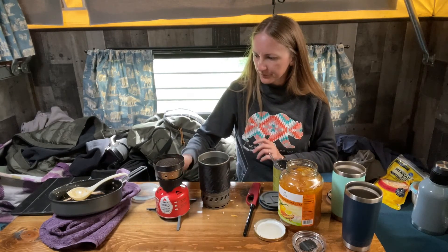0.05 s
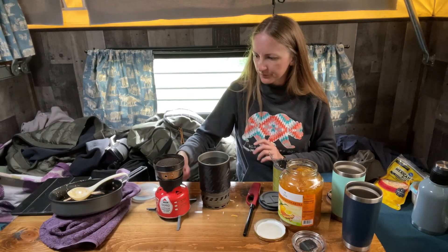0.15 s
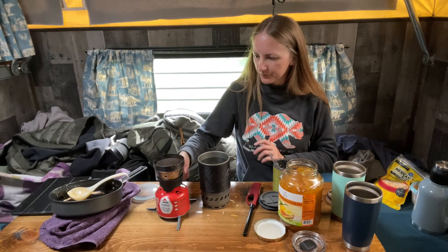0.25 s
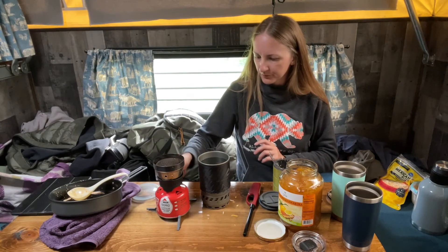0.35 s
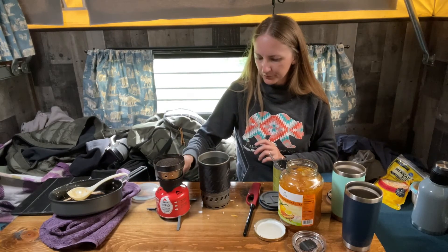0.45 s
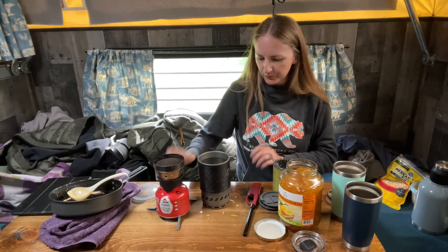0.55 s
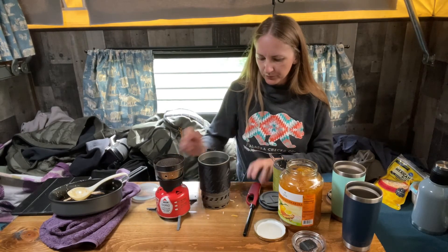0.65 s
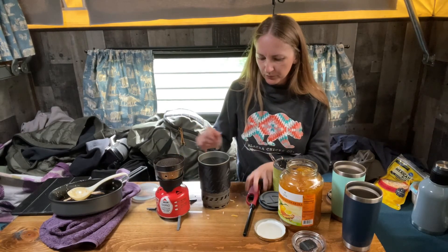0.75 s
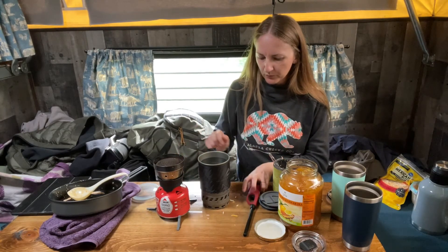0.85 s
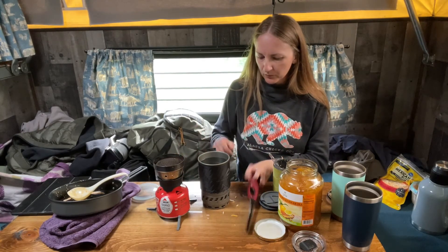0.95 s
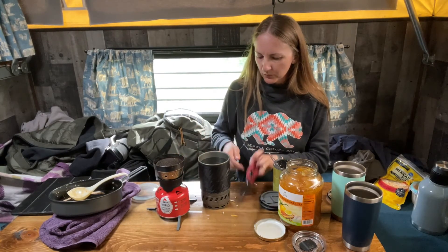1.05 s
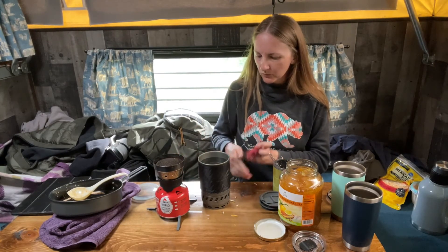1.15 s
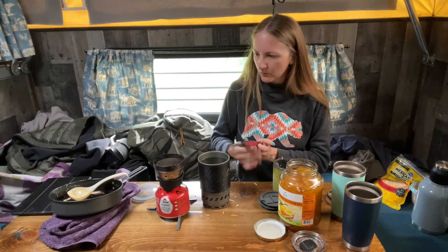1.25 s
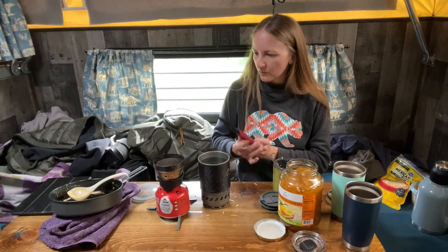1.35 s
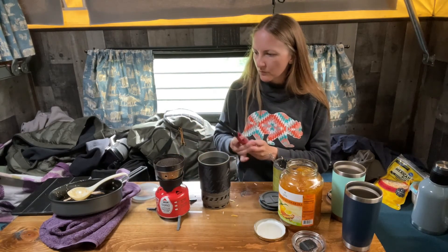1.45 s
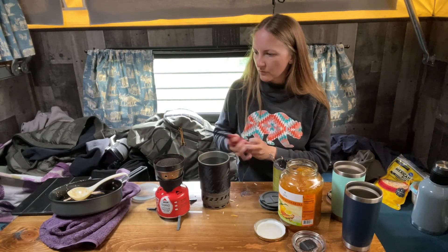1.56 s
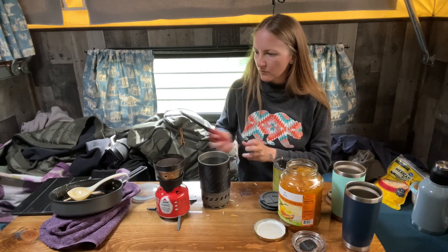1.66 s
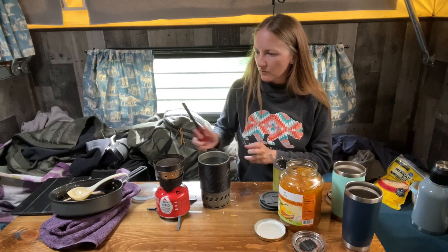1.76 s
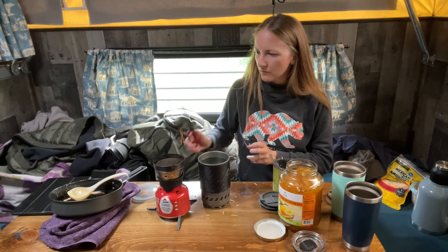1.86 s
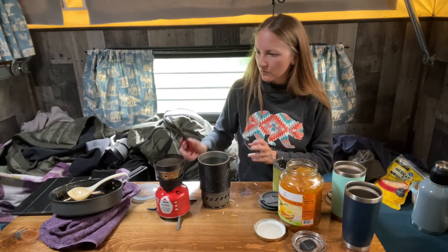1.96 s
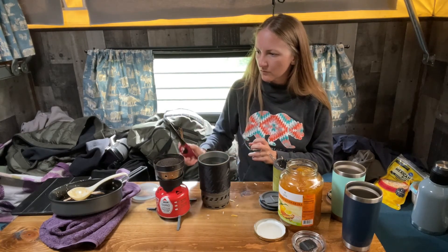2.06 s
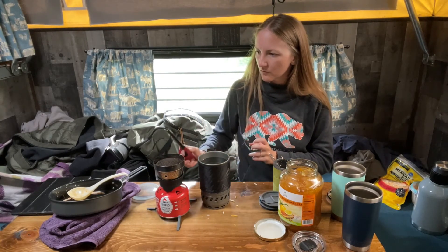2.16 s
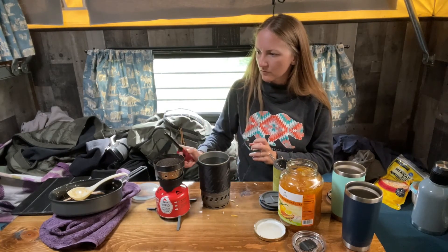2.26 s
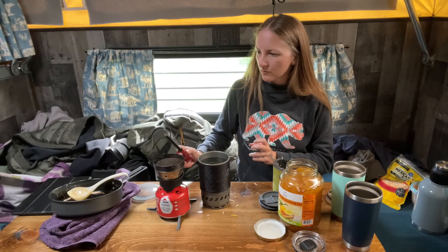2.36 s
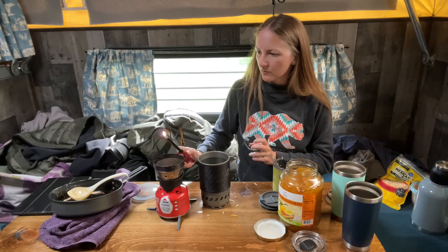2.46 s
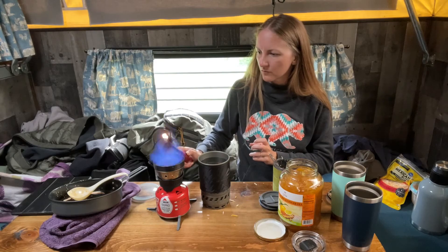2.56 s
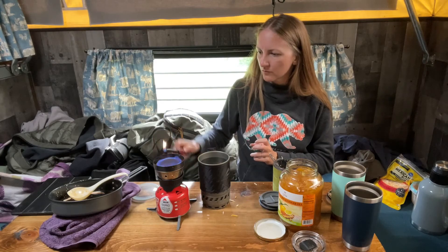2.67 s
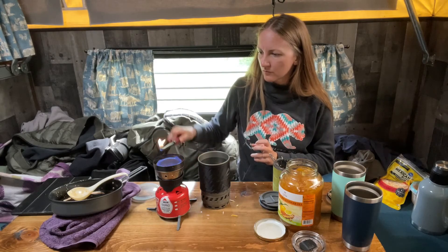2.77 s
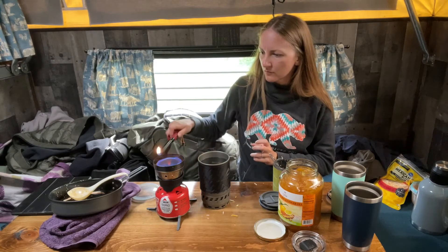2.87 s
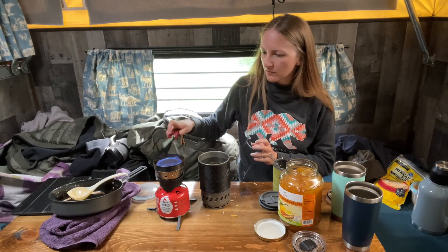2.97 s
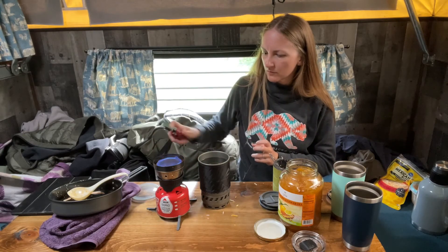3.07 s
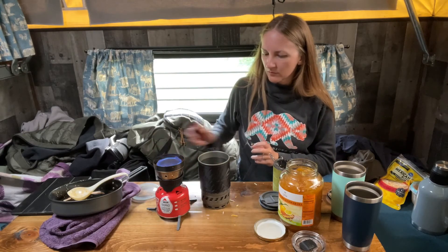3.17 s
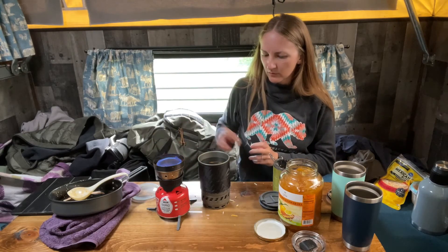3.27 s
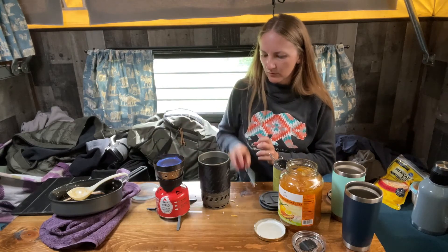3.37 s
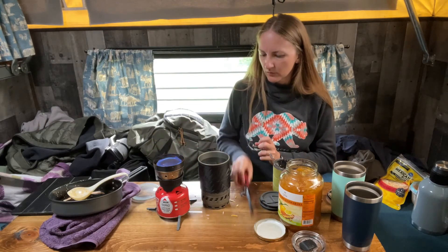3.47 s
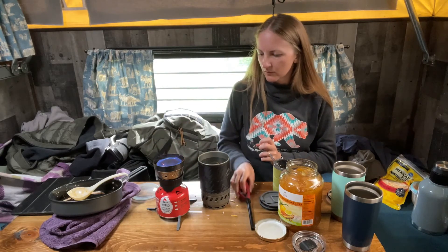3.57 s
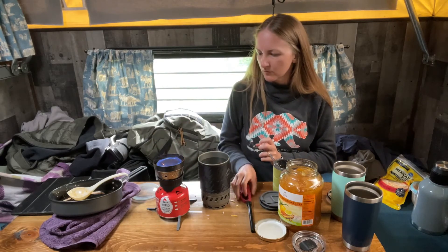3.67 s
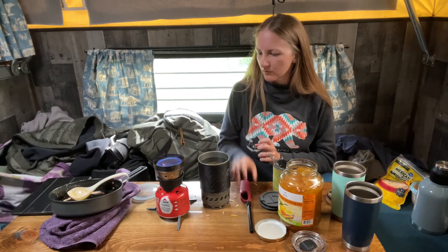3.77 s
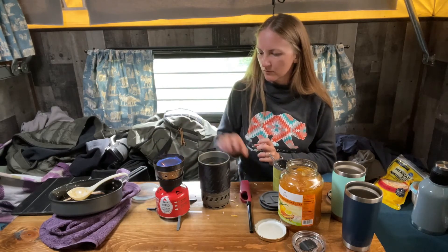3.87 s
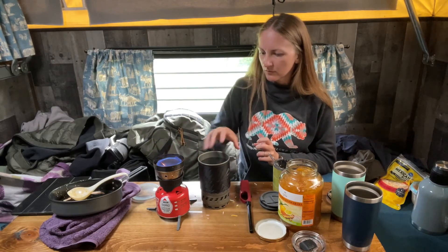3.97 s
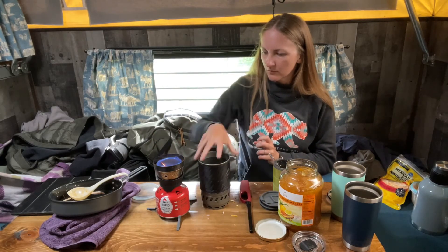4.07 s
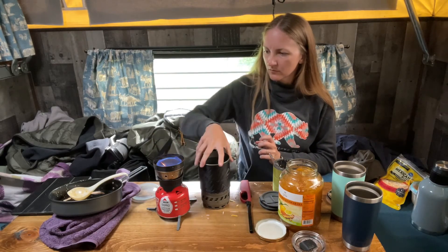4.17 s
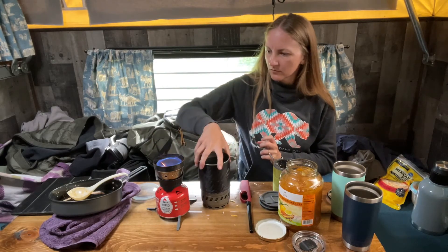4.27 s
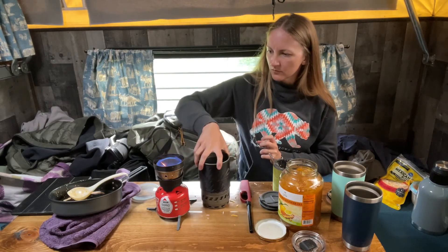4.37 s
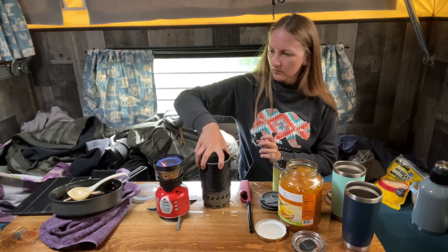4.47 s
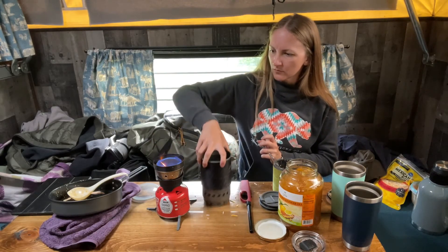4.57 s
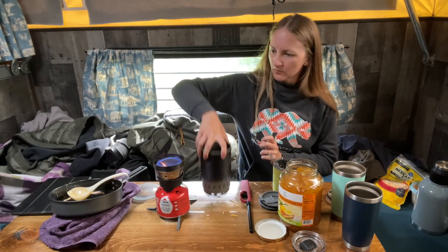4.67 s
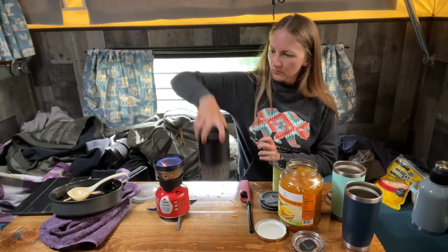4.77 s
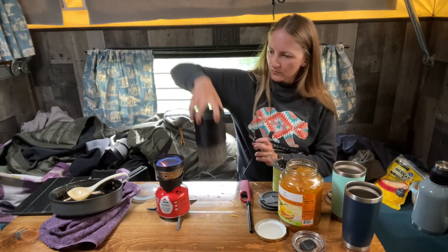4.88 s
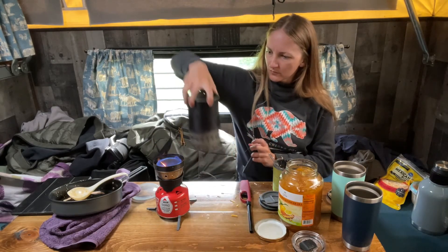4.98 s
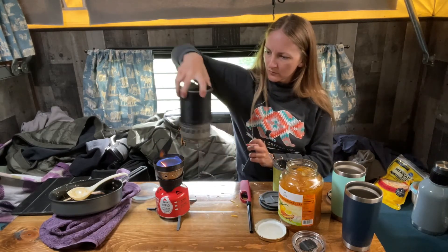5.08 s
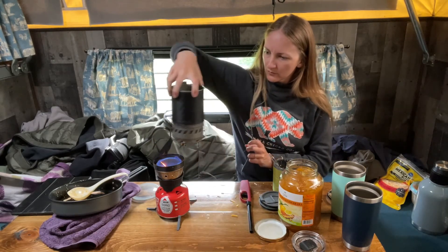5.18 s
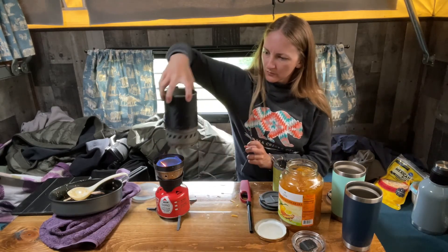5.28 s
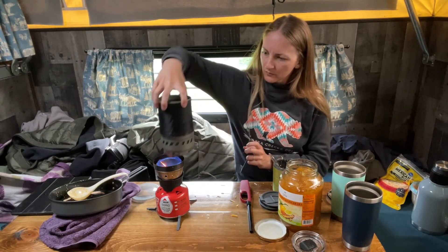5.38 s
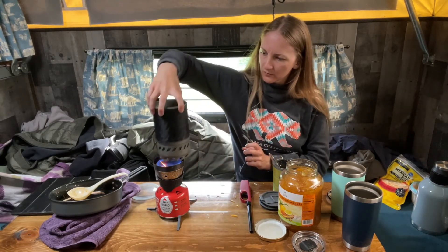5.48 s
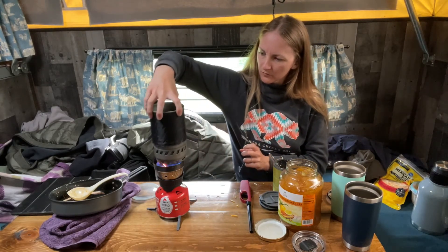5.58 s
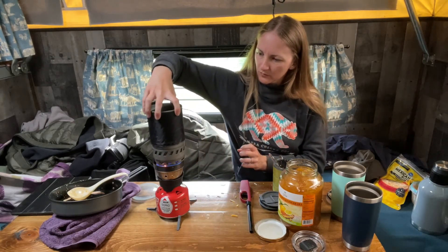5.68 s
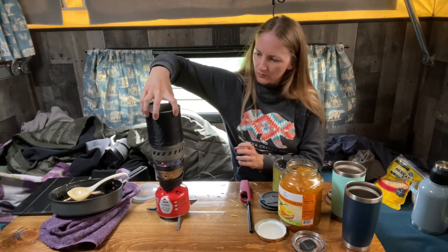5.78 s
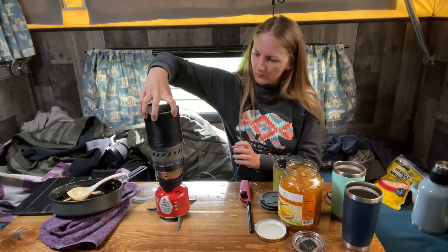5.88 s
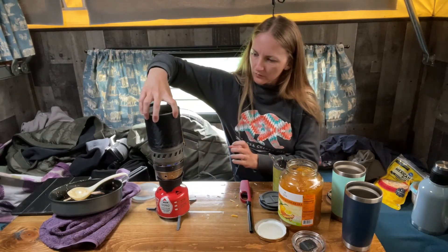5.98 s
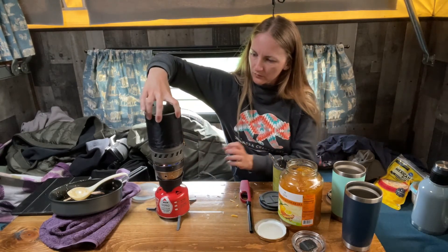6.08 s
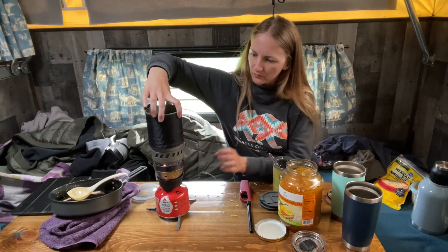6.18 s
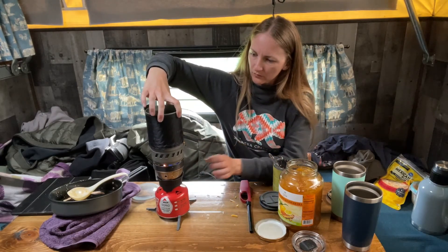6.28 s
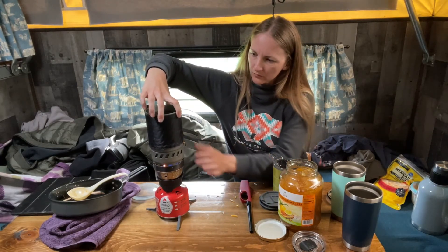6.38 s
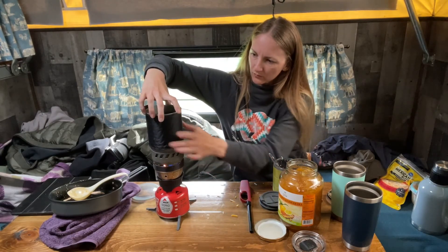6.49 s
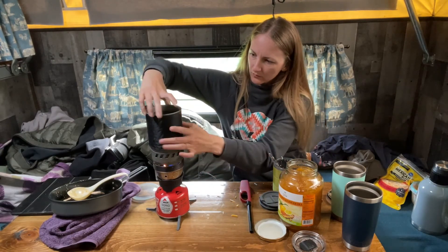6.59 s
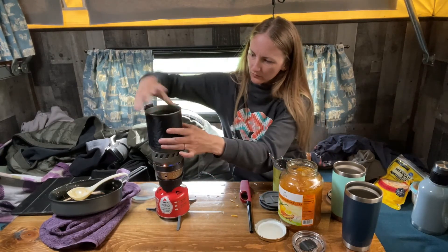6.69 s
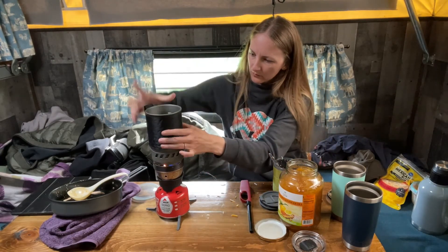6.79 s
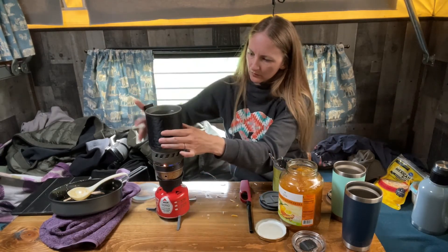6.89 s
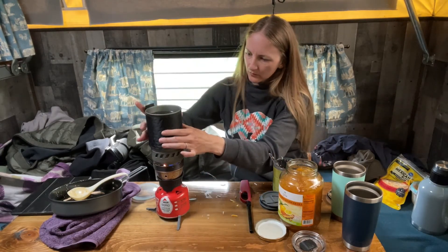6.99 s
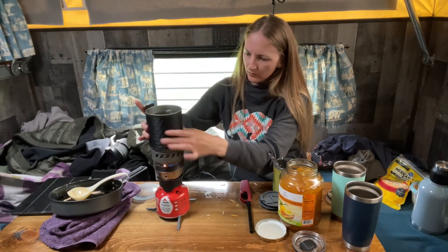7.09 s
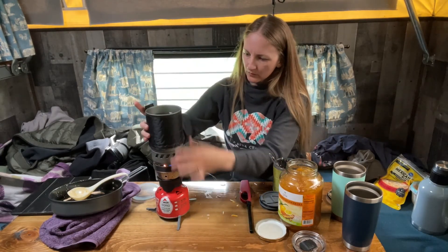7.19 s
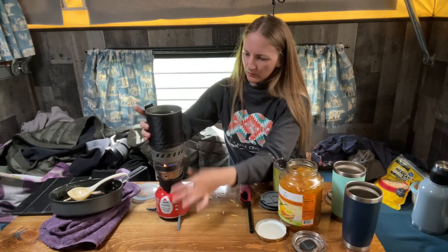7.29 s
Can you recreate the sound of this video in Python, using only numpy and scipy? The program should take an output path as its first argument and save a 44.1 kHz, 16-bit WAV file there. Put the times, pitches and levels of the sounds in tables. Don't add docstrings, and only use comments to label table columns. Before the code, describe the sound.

In a small padded cabin, stove gas hisses, a loud lighter click ignites it with a low whump, then tool and pot clunk down.

```python
import sys
import numpy as np
from scipy import signal
from scipy.fft import rfft, irfft, next_fast_len
from scipy.io import wavfile
from scipy.ndimage import uniform_filter1d

SR = 44100
rng = np.random.default_rng(int(sys.argv[2]) if len(sys.argv) > 2 else 0)


def boost_factor(decibels):
    exponent = np.asarray(decibels, float) / 20
    return 10 ** exponent


def transcribe(signal):
    frames = np.atleast_2d(signal).T
    limited = np.clip(frames, -1, 1)
    pcm = np.round(limited * 32767).astype(np.int16)
    wavfile.write(sys.argv[1], SR, pcm)


N = 323694
TIME_S = np.arange(N) / SR

# time_s, cover_0_to_1
POT_COVER = [
    (0, 0.05),
    (5.0, 0),
    (5.45, .3),
    (5.85, 0.62),
    (7.34, 0.76),
]
# pitch_hz, level_db_per_hz
OPEN_JET = [(76, -58), (130, -26.5), (450, -17.5), (640, -11), (1080, -18.5), (1700, -4.5), (3600, -11.5),
            (5200, -8), (6500, -6.5), (10200, -9.5), (11000, -15.5), (13300, -14), (14400, -10),
            (15700, -16)]
# pitch_hz, width_hz, level_db
OPEN_PEAKS = [(773, 72, -8.5), (938, 52, -5.5), (1279, 129, -3.5), (1474, 23, 0.5), (1760, 170, -7),
              (1925, 41, -3.5), (2396, 67, -2), (2750, 430, -12.5), (4180, 280, -6.5), (4636, 41, 4),
              (5030, 170, 1.5), (5252, 110, 4), (5548, 310, 2), (5885, 59, 7), (6180, 83, -0.5),
              (8870, 1400, -14)]
# pitch_hz, width_hz
OPEN_NULLS = (10600, 150), (10900, 100), (12400, 120), (13300, 350), (15000, 250)
# pitch_hz, level_db_per_hz
COVERED_JET = [(76, -44), (130, -3.5), (310, -10), (580, -17), (1100, -13), (1560, -1), (2500, -7.5),
               (3450, -18.5), (4900, -1.5), (6700, -7.5), (10000, -11), (11300, -18.5), (14400, -11),
               (15700, -21)]
# pitch_hz, width_hz, level_db
COVERED_PEAKS = [(793, 240, -6), (936, 45, 3.5), (1543, 192, 10), (2060, 120, -7), (2404, 55, 3),
                 (2620, 760, -3), (4940, 70, 11.5), (4930, 140, 11), (5750, 110, 3), (5910, 420, 6),
                 (6800, 600, -3), (8100, 840, -2), (9570, 2100, -3.5)]
# pitch_hz, width_hz
COVERED_NULLS = (6850, 120), (7250, 150), (11150, 400), (12600, 150), (14800, 200)
# pitch_hz, level_db_per_hz
SEEP = [(400, -30), (750, -8), (1600, -5), (3100, -9), (5400, -5), (8000, -10), (11000, -14), (15500, -15)]
# middle_s, flutter_gain_db, half_length_s
TABLE_SHAKES = [
    (2.5, 19, 0.052),
    (3.49, 10, 0.041),
    (3.66, 15, 0.075),
    (4.37, 6, 0.099),
    (5.6, 9, 0.12),
    (5.88, 9.5, 0.15),
    (7.22, 7, 0.053),
]
# start_s, level_db, pitch_hz, ring_t60_s
PUFFS = [
    (2.461, -37, 70, .12),
    (2.499, -25, 62, 0.071),
    (2.522, -23, 47, 0.15),
    (2.545, -21, 44.2, 0.14),
]
# start_s, peak_db, weight_db_per_octave (below the pivot), hardness_db_per_octave (above it)
LIGHTER_SNAPS = [
    (2.3501, -7, -9, -0.12),
    (2.807, -24, -9, -2.4),
]
TABLE_KNOCKS = [
    (0.6947, -46, 6.5, 1),
    (3.4313, -19.5, -8, 3),
    (3.4314, -11.5, -9, -8),
    (3.4404, -14.5, 1.5, -3),
    (3.4481, -16, -1.5, -9),
    (3.4655, -26, 0, -1),
    (3.5946, -19, 1.5, -8.5),
    (3.6576, -23, -2.5, -1),
    (3.6638, -32, 5.5, -3),
]
POT_SEATS = [
    (5.496, -19.5, -5, -3.5),
    (5.506, -26.5, -2, -4.5),
    (5.590, -21.5, -6.5, -10),
    (5.605, -33.5, -6, -2.5),
]
POT_SCUFFS = [(0.789, -29.5, -2.5, 0), (1.6073, -34.5, 1.5, -1.5), (2.1394, -35, -3, -2),
              (2.4978, -39, 6.5, 3), (2.526, -50, 4, -3), (3.4964, -24, -4.5, -4), (3.5799, -18.5, -12, -7),
              (4.0157, -23.5, -9, 3), (4.050, -28, -4.5, 0), (4.0616, -28.5, -6, 2), (4.075, -34, -2, -11),
              (4.105, -33, -0.5, -6), (4.139, -34, 1, -6), (4.165, -36, 0.5, -6), (4.3196, -42, 5, -2),
              (4.6135, -31, -3.5, -4), (4.7775, -33, 1.5, -6), (5.2094, -30.5, -0.5, -1.5),
              (5.6566, -28, -6, -6), (5.746, -26, -4, -3.5), (5.8581, -29, -2.5, -6),
              (6.005, -33, -1, -4.5), (6.2796, -30.5, -6, -6), (6.4644, -25.5, -2, -7)]
# low_hz, high_hz
BAND_HZ = (1900, 3400), (200, 800), (800, 1900), (3400, 7000), (7000, 16500)
# pitch_hz, level_db, ring_t60_s
LIGHTER = [(1430, -1, .012), (2300, 0, .016), (2800, -4, .010), (5000, -8, .012), (8550, -3, .02),
           (14180, -12, .008)]
TABLE = [(420, -9, .03), (800, -8, .03), (1560, 0, .016), (2024, -9, .05), (2320, -6, .015),
         (4900, -10, .012)]
POT = [(1020, -24, 0.12), (1400, 5.5, 0.0098), (2037, -16, 0.01), (2338, -7, 0.096), (3000, -6, 0.034),
       (4000, -3, 0.032), (4750, 2, 0.073), (6640, -21, 0.09), (8380, 8.5, 0.061)]
# struck_s, level_db, damped_by_wood_s
NOZZLE = [
    (3.433, -18, 3.494),
    (3.511, -34, 3.594),
]
# middle_s, peak_db, half_length_s
ROCKS = [
    (4.13, -53.5, 0.066),
    (4.38, -62, .08),
    (4.794, -51, .04),
    (5.16, -51, 0.068),
    (5.74, -50, .07),
    (6.304, -51, 0.042),
    (6.48, -51, 0.018),
    (6.816, -58, .04),
    (6.955, -58, .03),
    (7.248, -66, 0.031),
]
# start_s, level_db
THUMPS = [(0.71, -32.5), (0.824, -42), (3.458, -28), (3.616, -29.5), (3.674, -36), (4.342, -36.5),
          (5.513, -37), (5.61, -38), (5.688, -40), (5.752, -38), (5.928, -35)]
# pitch_hz, level_db, ring_t60_s
TABLE_TOP = (90, 0, .14), (103, 0, .14), (280, -9, .06)
# pitch_hz, level_db_per_hz
CABIN = [(12, -30), (20, -12), (40, -4), (91, 0), (140, -8), (260, -11), (450, -12), (700, -30), (990, -90)]


def jet():
    opens_s, turn_s = .17, 0.14
    shut_db, open_db, pot_muffles_db = -48, -37.5, -1.5
    turn = TIME_S * 1.7
    full = unit_rms(np.cos(turn) * gas() + np.sin(turn) * gas())
    seep = boost_factor(-50.5) * coloured(SEEP) * np.interp(TIME_S, [.24, .4], [1, 0])
    opening = np.clip((TIME_S - opens_s) / turn_s, 0, 1)
    level_db = shut_db + (open_db - shut_db) * opening + pot_muffles_db * pot_cover()
    return boost_factor(level_db) * full + seep


def gas():
    cover = np.clip(pot_cover(), 0, 1)
    bare = coloured(OPEN_JET, OPEN_PEAKS, OPEN_NULLS, valley_db=-4.5, peak_db=-2.0)
    hooded = coloured(COVERED_JET, COVERED_PEAKS, COVERED_NULLS, valley_db=-3.0, peak_db=-2.5)
    return cabin_echo(np.sqrt(1 - cover) * bare + np.sqrt(cover) * hooded, wet_db=-7)


def pot_cover():
    time_s, cover = np.transpose(POT_COVER)
    return np.interp(TIME_S, time_s, cover)


def flame():
    lit_s, flare_s = 2.345, 2.55
    lit = np.clip((TIME_S - lit_s) / .03, 0, 1)
    flare_width_s = np.where(TIME_S < flare_s, .04, 0.028)
    flare_db = 20 * np.exp(-((TIME_S - flare_s) / flare_width_s) ** 2)
    settle_db = -.5 * (TIME_S - lit_s)

    rumble = unit_rms(band(band(rng.standard_normal(N), 38.0, 72), 12.0, 132))
    low_flutter = band(rng.standard_normal(N), 72.0, 108.0)
    high_flutter = band(rng.standard_normal(N), 172, 322)
    flutter = unit_rms(low_flutter + boost_factor(-14) * high_flutter)

    flicker_hz, flicker_db = 3.8, 1
    rumble_db = -50 + flare_db + flicker_db * wander(flicker_hz)
    flutter_db = -55.5 + swells(TABLE_SHAKES) + flicker_db * wander(flicker_hz)
    return lit * boost_factor(settle_db) * (boost_factor(rumble_db) * rumble + boost_factor(flutter_db) * flutter)


def puffs():
    out = np.zeros(N)
    for start_s, db, hz, t60_s in PUFFS:
        push = np.zeros(N)
        push[round(start_s * SR)] = boost_factor(db)
        out += ring(push, hz, t60_s)
    return band(out, 22, 300)


def contacts(events, modes, crack_db, rattle_s, rise_s, ring_share, bass_db, near_db=0):
    pivot_hz = 2540
    out, length = np.zeros(N), SR // 4
    t = np.arange(length) / SR
    for start_s, db, weight, hardness in events:
        envelope = np.exp(-t / rattle_s) * np.minimum(t / rise_s, 1)
        rattle = rng.standard_normal(length) * envelope
        body = np.zeros(length)
        for hz, mode_db, t60_s in modes:
            strike = rattle * rng.standard_normal(length)
            body += boost_factor(mode_db + rng.normal(0, 1.8)) * ring(strike, hz, t60_s * ring_share)
        crack = unit_rms(np.diff(rattle, prepend=0))
        sound = cabin_echo(unit_rms(body) + boost_factor(crack_db) * crack, wet_db=-1.5 + near_db)

        at = round(start_s * SR)
        for low_hz, high_hz in BAND_HZ:
            octaves = np.log2(np.sqrt(low_hz * high_hz) / pivot_hz)
            slope = hardness if octaves > 0 else -weight
            level_db = db + slope * octaves + bass_db * (octaves < -2)
            edges = .85 * low_hz, 1.15 * high_hz
            part = band(band(sound, *edges), *edges)
            out[at:at + length] += boost_factor(level_db) * part / np.abs(part).max()
    return out


def nozzle():
    level = np.zeros(N)
    for struck_s, db, damped_s in NOZZLE:
        free_db = -60 * np.maximum(TIME_S - struck_s, 0) / 0.5
        damped_db = -60 * np.maximum(TIME_S - damped_s, 0) / 0.022
        level += boost_factor(db + free_db + damped_db) * np.clip((TIME_S - struck_s) / .002, 0, 1)
    return level * np.sin(2 * np.pi * 3796 * TIME_S)


def slosh():
    level = swells([(middle_s, boost_factor(db), half_s) for middle_s, db, half_s in ROCKS])
    return level * unit_rms(ring(rng.standard_normal(N), hz=346, t60_s=0.071))


def thumps():
    pushes = np.zeros(N)
    for start_s, db in THUMPS:
        pushes[round(start_s * SR)] = boost_factor(db + 2.0)
    sway = np.zeros(N)
    for k, (hz, db, t60_s) in enumerate(TABLE_TOP):
        sway += (-1) ** k * boost_factor(db) * ring(pushes, hz, t60_s)
    return band(sway, 38, 360)


def cabin_hum():
    return boost_factor(-61) * coloured(CABIN)


def cabin_echo(x, wet_db):
    t = np.arange(SR // 5) / SR
    fade = boost_factor(-60 * t / .10)
    tail = rng.standard_normal(len(t)) * fade * np.minimum(t / 0.0014, 1)
    tail = boost_factor(wet_db) * tail / np.sqrt(np.sum(tail ** 2))
    tail[0] = 1
    return signal.fftconvolve(x, tail / np.sqrt(np.sum(tail ** 2)))[:len(x)]


def coloured(spectrum, peaks=(), nulls=(), valley_db=0., peak_db=0.):
    size = next_fast_len(N)
    hz = np.arange(size // 2 + 1) * SR / size + 1
    point_hz, point_db = np.transpose(spectrum)
    power = boost_factor(2 * (np.interp(np.log(hz), np.log(point_hz), point_db) + valley_db))
    for centre_hz, width_hz, db in peaks:
        power = power + boost_factor(2 * (db + peak_db)) / (1 + (2 * (hz - centre_hz) / width_hz) ** 2) ** 2
    for centre_hz, width_hz in nulls:
        power = power * (1 - .96 / (1 + (2 * (hz - centre_hz) / width_hz) ** 2))
    noise = rfft(rng.standard_normal(size))
    return unit_rms(irfft(np.sqrt(power) * noise, size)[:N])


def ring(clicks, hz, t60_s):
    r, w = boost_factor(-60 / (t60_s * SR)), 2 * np.pi * hz / SR
    return signal.lfilter([0, np.sin(w)], [1, -2 * r * np.cos(w), r * r], clicks + 1e-18)


def swells(rows):
    return sum(height * np.exp(-((TIME_S - middle_s) / half_s) ** 2) for middle_s, height, half_s in rows)


def wander(rate_hz):
    return unit_rms(band(rng.standard_normal(N + SR), rate_hz / 4, rate_hz)[SR:])


def band(x, low_hz, high_hz):
    return signal.sosfilt(signal.butter(2, [low_hz, high_hz], "band", fs=SR, output="sos"), x)


def unit_rms(x):
    return x / np.sqrt(np.mean(x ** 2) + 1e-20)


def scene():
    snaps = boost_factor(4.0) * contacts(LIGHTER_SNAPS, LIGHTER, crack_db=2.0, rattle_s=.004, rise_s=.001,
                                ring_share=1.2, bass_db=-4.0)
    knocks = boost_factor(4.0) * contacts(TABLE_KNOCKS, TABLE, crack_db=7.0, rattle_s=.0035, rise_s=.0005,
                                 ring_share=.6, bass_db=-14.0, near_db=-3.0)
    scuffs = boost_factor(-4.0) * contacts(POT_SCUFFS, POT, crack_db=10.0, rattle_s=.008, rise_s=.002,
                                  ring_share=.5, bass_db=-8.0)
    seats = boost_factor(5.5) * contacts(POT_SEATS, POT, crack_db=3.0, rattle_s=0.005, rise_s=0.002,
                                ring_share=.4, bass_db=-17.0, near_db=-3.0)
    burner = jet() + flame() + puffs()
    handling = snaps + knocks + nozzle() + scuffs + seats
    mono = burner + handling + slosh() + thumps() + cabin_hum()
    return np.stack([mono, mono])


def top_cut(x):
    return signal.sosfilt(signal.butter(12, 16840, fs=SR, output="sos"), x)


def record(dry):
    clipped = np.clip(dry[0], -1, 1)
    hz, _, cells = signal.stft(clipped, SR, nperseg=2048, scaling="psd")
    hz = hz[:, None]
    patch = uniform_filter1d(np.abs(cells) ** 2, size=9, axis=0)
    strong = patch > boost_factor(2 * -98)
    keep = (strong | (hz < 6500)) & (hz < 15800)
    mono = signal.istft(cells * keep, SR, nperseg=2048, scaling="psd")[1][:N]
    mix = np.stack([mono, mono])
    return top_cut(mix)


dry = scene()
out = record(dry)
transcribe(out)
```